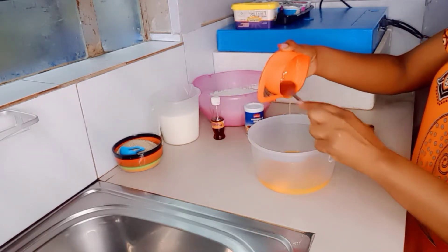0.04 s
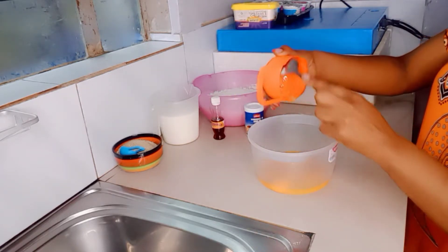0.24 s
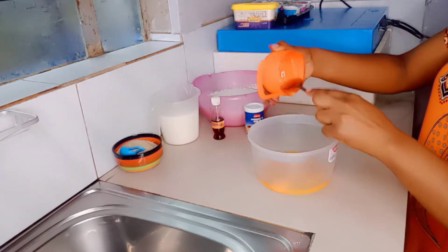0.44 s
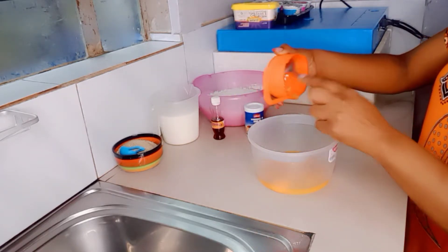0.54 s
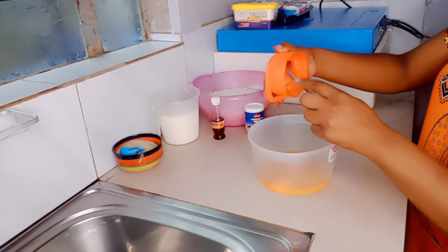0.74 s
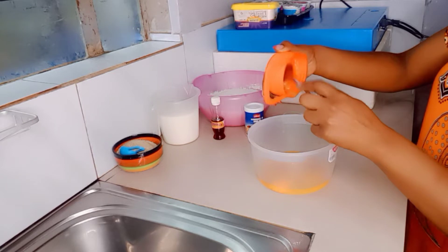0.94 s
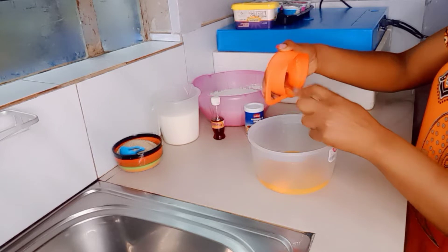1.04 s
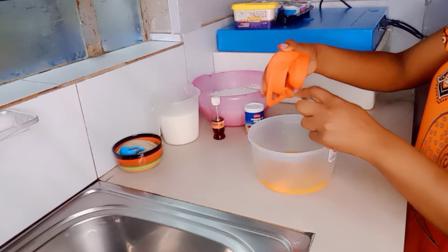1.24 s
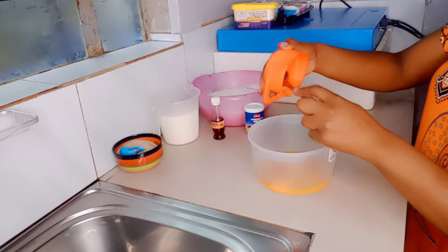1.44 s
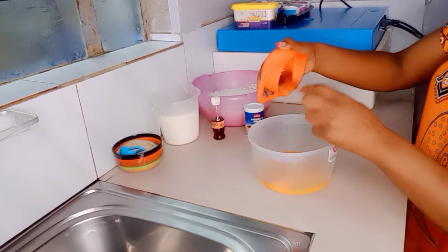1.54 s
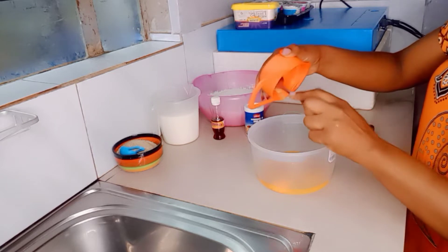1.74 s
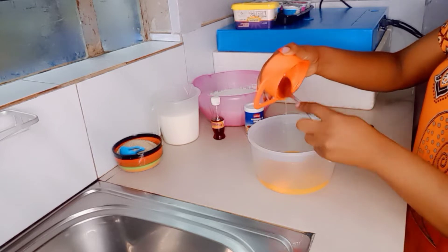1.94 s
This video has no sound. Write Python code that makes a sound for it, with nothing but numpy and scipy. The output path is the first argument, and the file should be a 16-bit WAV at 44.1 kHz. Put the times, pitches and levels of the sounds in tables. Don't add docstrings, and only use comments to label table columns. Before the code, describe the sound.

A metal spoon taps and scrapes inside a small plastic cup in a hard tiled kitchen

```python
import sys
import numpy as np
from scipy import signal
from scipy.fft import rfft, irfft, next_fast_len
from scipy.io import wavfile

SR = 44100
rng = np.random.default_rng(int(sys.argv[2]) if len(sys.argv) > 2 else 0)


def volts_from_db(level):
    exponent = np.asarray(level, float) / 20
    return 10 ** exponent


def put_to_file(sound):
    columns = np.atleast_2d(sound).T
    safe = np.clip(columns, -1, 1)
    whole_steps = np.round(safe * 32767)
    wavfile.write(sys.argv[1], SR, whole_steps.astype(np.int16))


N = 88200
LEAD_S = 0.1
RISE_S = 0.00065

# t/s, level/dB, cavity f/Hz, overtone level/dB, wall level/dB
LOADED_TAPS = [(0.2609, -19.5, 947, -8, -6), (0.5328, -10, 1109, -6, -8), (0.7509, -13.5, 1101, -7, -11)]
# t/s, level/dB, cavity f/Hz, overtone level/dB, wall level/dB
CLEARED_TAPS = [(-.045, -24.5, 1273, -4, -2.5), (0.9583, -14, 1296, -3, -13), (1.1594, -18, 1301, -2, -7),
                (1.3559, -18.5, 1316, -3, -7.5), (1.6118, -14, 1268, -4, -14.5)]
# t/s, level/dB, main mode f/Hz, level of the other rim modes/dB, wall level/dB
RIM_KNOCKS = [
    (.1938, -29, 1786, 7.5, -1),
    (0.2137, -35, 1840, 11, -25),
    (.515, -40.5, 1950, -0.5, -52),
    (.7318, -41, 1940, 17.5, 13.5),
    (1.5415, -12, 2137, 6.5, -9),
]
# f/Hz, level/dB, t60/s
CLEARED_WALL = [(223.5, -4.5, 0.021), (310, -7, 0.12), (477, -8, 0.11), (658, -1.5, 0.036)]


def ring(modes, detune, contact_s):
    t = np.arange(2048) / SR
    out = np.zeros(len(t))
    for (hz, db, t60), d in zip(modes, detune):
        tone = np.sin(2 * np.pi * hz * (1 + 0.008 * d) * t)
        out += volts_from_db(db) * tone * np.exp(-np.log(1000) * t / t60)
    release_s = 0.0023
    choke = np.exp(-np.maximum(t - contact_s, 0) / release_s)
    return out * (1 - np.exp(-t / RISE_S)) * choke


def cavity_taps(size):
    # multiple of its pitch, level/dB, t60/s
    loaded_cavity = [(.92, -12.5, 0.013), (1.1, -13, 0.024), (2.04, 6.5, 0.013), (2.4, -11, 0.032),
                     (3.04, -7.5, 0.042), (3.46, -5, 0.016)]
    cleared_cavity = [(.86, -16, 0.079), (1.14, -6.5, 0.016), (1.83, -1, 0.035), (2.12, -0.5, 0.041),
                      (2.71, -8, 0.021), (3.03, -12, 0.041)]
    # f/Hz, level/dB, t60/s
    loaded_wall = [(230, -19, 0.022), (334.3, 0, 0.032), (536, 3.5, 0.053), (776, 3.5, 0.019)]
    out = np.zeros(size)
    for taps, cavity, wall in ((LOADED_TAPS, loaded_cavity, loaded_wall),
                               (CLEARED_TAPS, cleared_cavity, CLEARED_WALL)):
        for s, db, hz, over_db, wall_db in taps:
            modes = [(hz, 0, 0.04)]
            for k, (multiple, level, t60) in enumerate(cavity):
                modes.append((hz * multiple, level + over_db * (k > 1), t60))
            modes += [(f, level + wall_db, t60) for f, level, t60 in wall]
            add(out, s, volts_from_db(db) * ring(modes, rng.standard_normal(11), contact_s=0.0029))
    return out


def rim_knocks(size):
    # f/Hz, level/dB, t60/s
    rim = [(1062, -21.5, 0.09), (1603, -13.5, .02), (2928, -5.5, 0.018), (3100, -9, 0.013),
           (3620, -11.5, 0.018), (4290, -17.5, 0.017)]
    out = np.zeros(size)
    for s, db, hz, others_db, wall_db in RIM_KNOCKS:
        modes = [(hz, 0, 0.025)]
        modes += [(f, level + others_db, t60) for f, level, t60 in rim]
        modes += [(f, level + wall_db, t60) for f, level, t60 in CLEARED_WALL]
        add(out, s, volts_from_db(db) * ring(modes, 3 * rng.standard_normal(11), contact_s=0.0066))
    return out


def spoon(size):
    # level/dB, centre f/Hz, width/octaves
    contact_ticks = [(-32, 3000, 2.1), (-29, 3260, 1.4), (-36.5, 6200, 1.14), (-43, 4900, 1.5),
                     (-33.5, 3360, 1.3), (-37.5, 3300, 1.3), (-35, 2650, 1.42), (-36, 5600, 0.94),
                     (-39.5, 2500, 2.2), (-41, 7000, 2.6), (-66, 13000, 2.8), (-39, 3700, 0.97),
                     (-29.5, 6400, 1.2)]
    # t/s, level/dB, centre f/Hz, width/octaves
    strays = [(0.273, -56, 9000, 1.9), (1.023, -50, 9050, 0.72), (1.215, -44, 10900, 0.12),
              (1.416, -48.5, 9400, 0.5), (1.558, -43, 7000, 1.6)]
    hits = [*LOADED_TAPS, *CLEARED_TAPS, *RIM_KNOCKS]
    ticks = [(hit[0], *tick) for hit, tick in zip(hits, contact_ticks)]
    out, t = np.zeros(size), np.arange(256) / SR
    tick_s = 0.004
    fade = np.exp(-(t / tick_s) ** 2) * (1 - np.exp(-t / RISE_S))
    for s, db, hz, octaves in [*ticks, *strays]:
        chatter = rng.standard_normal(256) * fade
        chatter = irfft(np.exp(1j * np.angle(rfft(chatter))))
        chatter = unit(chatter * fade) * fade.mean() ** 0.5
        band = bell(hz, octaves)[:1024]
        band = band / np.sqrt(np.sum(band ** 2))
        add(out, s, volts_from_db(db) * np.convolve(chatter, band))
    return out


def scrape(size):
    # t/s, length/s, level/dB, centre f/Hz
    scrapes = [
        (.197, 0.073, -41.5, 2530),
        (.734, 0.018, -42.5, 2880),
        (1.551, 0.046, -38.5, 3030),
        (1.86, 0.11, -70.5, 8800),
    ]
    slips_per_s, spread_db = 900, 4.5
    out, t = np.zeros(size), np.arange(8192) / SR
    for s, length, db, hz in scrapes:
        timing, side, force = rng.random((3, 8192))
        slips = (timing < slips_per_s / SR) * np.sign(side - 0.5)
        slips = slips * volts_from_db(-spread_db * np.log(force + 1e-6))
        drag = unit(np.convolve(slips, bell(hz, 0.67)[:512]))[:8192]
        add(out, s, volts_from_db(db) * drag * np.clip(1 - t / length, 0, 1) ** 0.5)
    return out


def kitchen():
    # f/Hz, t60/s
    room_t60 = [(150, 1), (500, 0.44), (1200, 0.47), (2500, 0.39), (5000, 0.47), (8000, 0.47),
                (12000, 0.29), (16000, 0.44)]
    # f/Hz, level/dB
    room_colour = [(150, -5), (500, -4), (1200, 4), (2500, -7), (5000, -3), (8000, -6.5), (12000, -7),
                   (16000, 1)]
    # f/Hz, time/s
    room_fill = [(300, 0.014), (1100, 0.014), (2500, 0.004), (8000, 0.0049)]
    room_db, gap_s = -25.5, 0.00067
    early_db, early_s = 1.5, 0.0061
    t = np.arange(SR) / SR
    noise, tail = rng.standard_normal(SR), 0
    for hz in 100 * 2 ** (np.arange(16) / 2):
        band = shape(noise, lambda f: 20 * np.log10(
            1e-6 + np.clip(1 - 2 * abs(np.log2((f + 1) / hz)), 0, 1)))
        decay = volts_from_db(on_log(room_colour, hz) - 60 * t / on_log(room_t60, hz))
        build = 1 - np.exp(-np.maximum(t - gap_s, 0) / on_log(room_fill, hz))
        early = volts_from_db(early_db) * np.exp(-t / early_s) * (t > gap_s) * min(hz / 2000, 1)
        tail = tail + band * decay * (build + early)
    return volts_from_db(room_db) * tail


def floor():
    # f/Hz, level/dB
    room_noise = [(30, -64), (70, 5), (200, 5), (500, 5), (1200, -4), (3500, -8.5), (5000, -25),
                  (16000, -46)]
    # f/Hz, level/dB, width/Hz
    hum = [(63, -64, 23), (113, -70, 4.7), (176, -60.5, 21), (242, -57.5, 4), (11200, -80, 120),
           (10050, -83, 60)]
    # centre t/s, length/s, f/Hz, level/dB
    drones = [(.67, 0.083, 66, -51.5), (0.86, 0.27, 173.5, -48), (1.11, 0.1, 62, -53),
              (1.45, 0.21, 63, -47.5), (1.49, 0.1, 176.3, -47), (1.657, .1, 64.7, -54),
              (1.78, 0.23, 176, -51.5)]
    t = np.arange(N) / SR
    out = volts_from_db(-51) * unit(shape(rng.standard_normal(N), lambda f: on_log(room_noise, f)))
    for hz, db, width_hz in hum:
        waver = shape(rng.standard_normal(N), lambda f: -20 * np.log10(1 + (2 * (f - hz) / width_hz) ** 2))
        out = out + volts_from_db(db) * unit(waver)
    for s, length, hz, db in drones:
        swell = np.exp(-(2 * (t - s) / length) ** 4)
        out = out + volts_from_db(db) * np.sin(2 * np.pi * hz * t) * swell
    return out


def add(out, s, x):
    i = int(round((s + LEAD_S) * SR))
    out[i:i + len(x)] += x[:len(out) - i]


def unit(x):
    return x / np.sqrt(np.mean(x ** 2))


def on_log(table, hz):
    f, value = np.transpose(table)
    return np.interp(np.log(hz + 1), np.log(f), value)


def shape(x, db_of_hz):
    size = next_fast_len(len(x) + 4096)
    gain = volts_from_db(db_of_hz(np.arange(size // 2 + 1) * SR / size))
    return irfft(rfft(x, size) * gain, size)[:len(x)]


def causal(db_of_hz):
    c = irfft(np.log(volts_from_db(db_of_hz(np.arange(1025) * SR / 2048))))
    c[1:1024] *= 2
    c[1025:] = 0
    return irfft(np.exp(rfft(c)))


def bell(hz, octaves):
    return causal(lambda f: np.maximum(-6 * (np.log2((f + 1) / hz) / octaves) ** 2, -80))


def scene():
    lead = int(LEAD_S * SR)
    size = N + lead
    hits = spoon(size) - cavity_taps(size) - rim_knocks(size) + scrape(size)
    half_low_cut_hz = 152
    low_cut = signal.butter(2, 2 * half_low_cut_hz, "high", fs=SR, output="sos")
    taps = signal.sosfilt(low_cut, hits)
    sway_turns = 0.52
    place = 2 * np.pi * sway_turns * np.arange(size) / size
    wet = signal.fftconvolve(taps * np.cos(place), kitchen())
    wet = wet + signal.fftconvolve(taps * np.sin(place), kitchen())
    direct_db = 1
    return (volts_from_db(direct_db) * taps[lead:] + wet[lead:size] + floor())[None]


def band_limit(x):
    return signal.sosfilt(signal.butter(12, 16800, fs=SR, output="sos"), x)


def record(dry):
    # f/Hz, width/Hz, level/dB
    mic = [(3790, 935, 4), (4930, 1080, -5), (7265, 1044, 14), (12170, 250, 6.5), (12300, 460, -3.5),
           (15330, 450, 8)]
    top_hz, top_db = 15600, -28

    def colour(f):
        peaks = sum(db / (1 + (2 * (f - hz) / width_hz) ** 2) for hz, width_hz, db in mic)
        return peaks + top_db * np.clip((f - top_hz) / 150, 0, 1)

    mix = signal.fftconvolve(dry[0], causal(colour))[None, :N]
    return band_limit(mix)


dry = scene()
out = record(dry)
put_to_file(out)
```